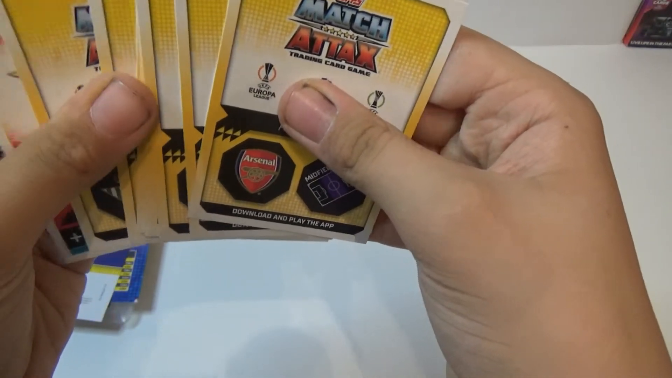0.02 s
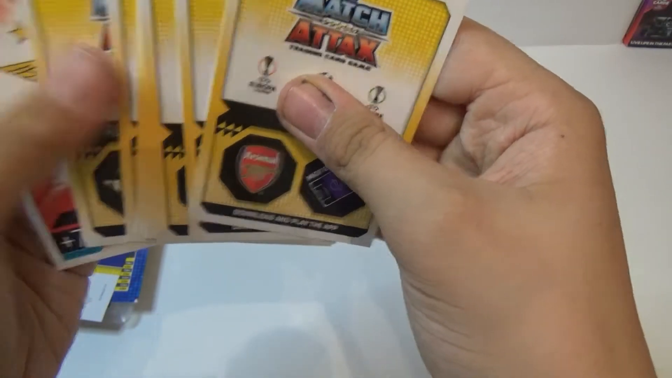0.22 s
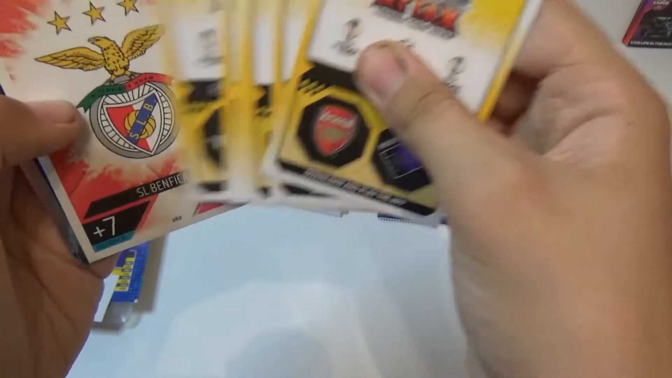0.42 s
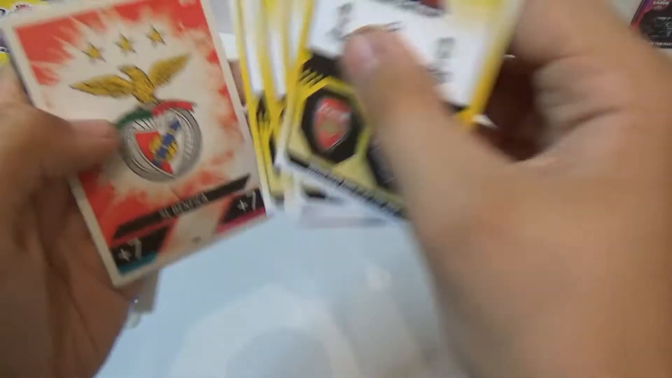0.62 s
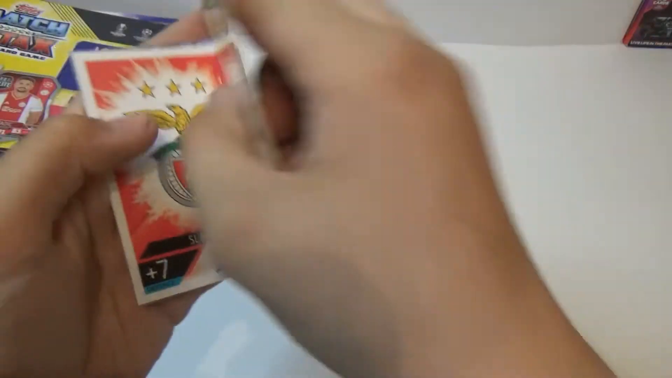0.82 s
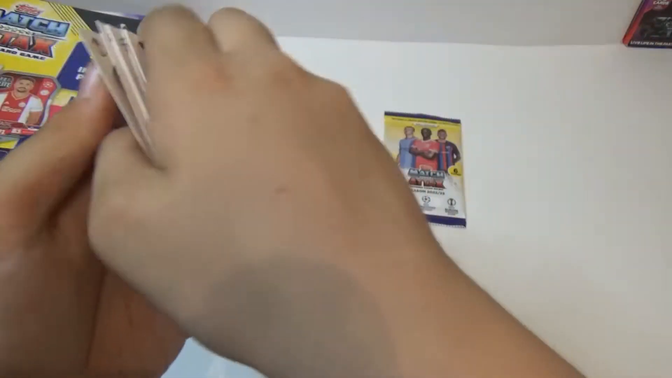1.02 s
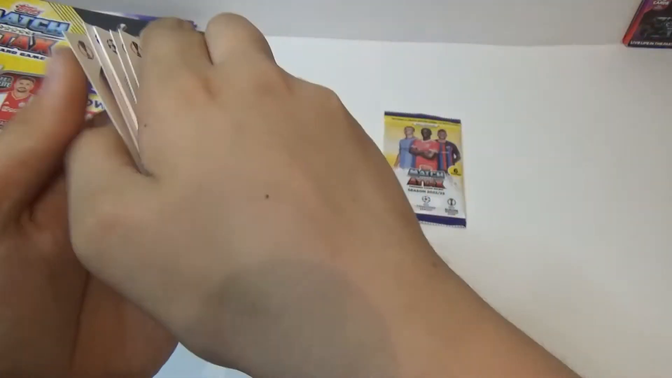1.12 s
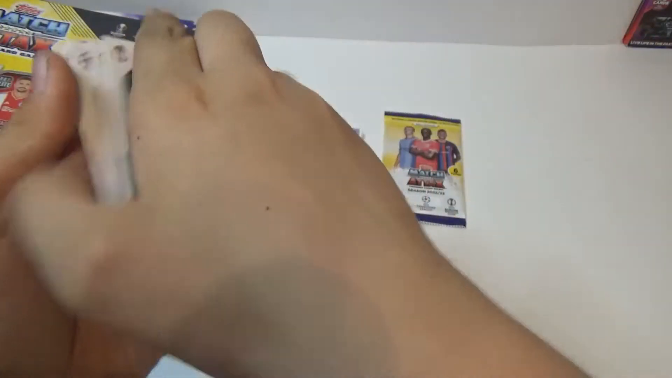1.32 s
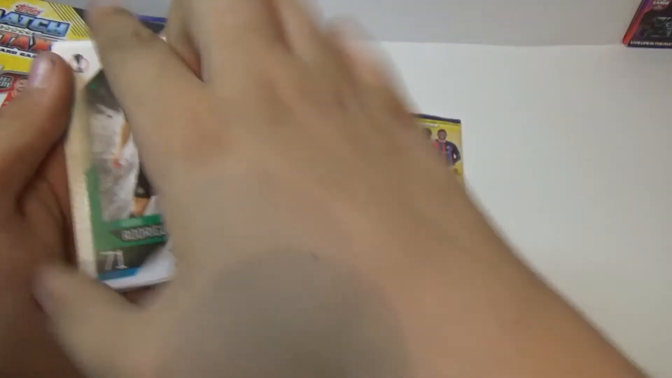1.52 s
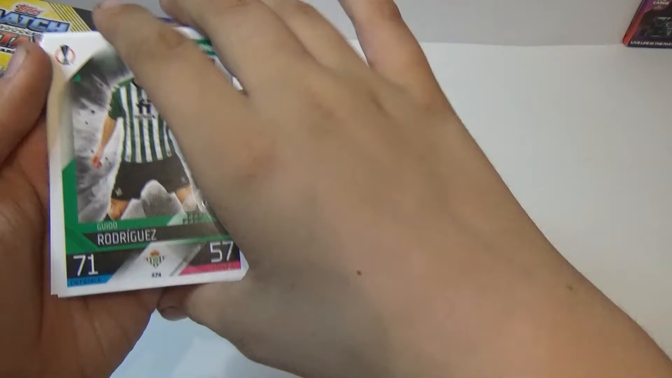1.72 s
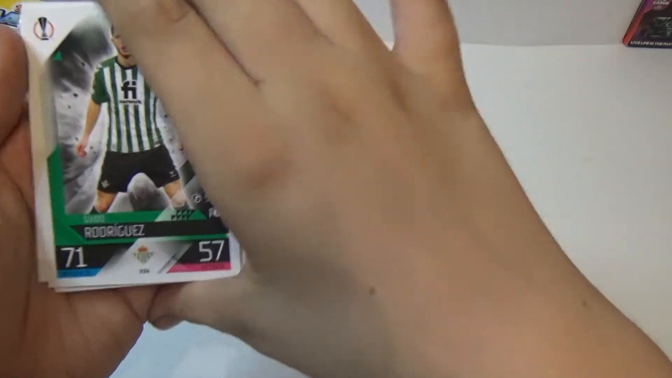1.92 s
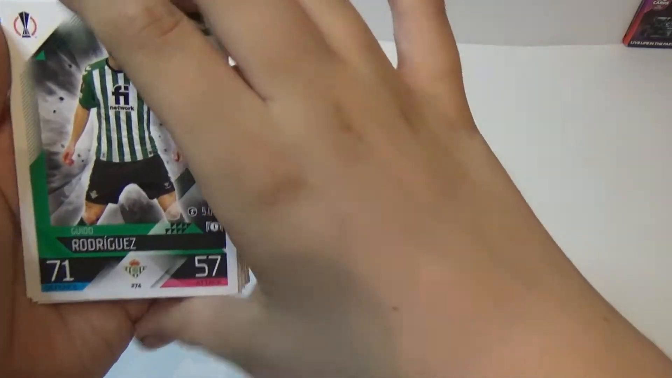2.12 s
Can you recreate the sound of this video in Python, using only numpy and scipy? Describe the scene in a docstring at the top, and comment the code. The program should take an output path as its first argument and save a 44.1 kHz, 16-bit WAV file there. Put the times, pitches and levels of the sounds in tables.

```python
"""A fan of trading cards is swept shut in the hands, knocked into a stack and squared up, close by in a small room.
Sliding cards are grainy coloured noise, and a bent card sings as a band of noise climbing in pitch.
Snapping edges are short noise cracks, the stack clacks as damped modes, and glossy faces squeak as wavering tones.
Soft low noise bursts are the thuds against the fingers; the room answers with a short diffuse tail.
Under it lies a steady room hiss with a faint regular tick."""
import sys
import numpy as np
from scipy import signal
from scipy.fft import rfft, irfft
from scipy.io import wavfile

SR = 44100
rng = np.random.default_rng(int(sys.argv[2]) if len(sys.argv) > 2 else 0)


def dump(signal):
    """Clip the signal to [-1, 1] and save it as 16-bit WAV at the path in sys.argv[1]."""
    limited = np.clip(np.atleast_2d(signal).T, -1, 1)
    pcm = np.round(limited * 32767).astype(np.int16)
    wavfile.write(sys.argv[1], SR, pcm)


N = 97020
T = np.arange(N) / SR  # seconds


def from_db(db):
    """Decibels to gain."""
    return 10 ** (np.asarray(db) / 20)


def rms_one(x):
    """Scale to unit rms."""
    return x / np.sqrt(np.mean(x ** 2) + 1e-20)


def at_hz(points, size):
    """Read a spectrum table at the bins of a transform, along a log pitch axis."""
    hz, value = np.transpose(points)
    bins_hz = np.fft.rfftfreq(size, 1 / SR)
    return np.interp(np.log(bins_hz + 1), np.log(hz), value)


def colour(x, points):
    """Give a steady signal a spectrum; unit rms."""
    return rms_one(irfft(rfft(x) * from_db(at_hz(points, N)), N))


def white_noise():
    """Flat noise for the whole scene."""
    return rng.standard_normal(N)


def drift(rate_hz):
    """Smooth random wander of spread 1: noise with everything faster than the rate rolled off."""
    rolloff = 1 + (np.fft.rfftfreq(N, 1 / SR) / rate_hz) ** 2
    return rms_one(irfft(rfft(white_noise()) / rolloff, N))


def flutter(spread_db, rate_hz):
    """A gain that wanders between random levels, two new ones per cycle of the rate."""
    steps = 2 * rate_hz * T
    return np.interp(steps, np.arange(2000), from_db(spread_db * rng.standard_normal(size=2000)))


GRAINS_PER_S, GRAIN_SPREAD_DB = 4500, 3.5
GRAIN_SHARE = 0.49  # share of the power in grains; the rest is smooth hiss
JUDDER_DB, JUDDER_HZ = 1.13, 90
PATCHY_DB, PATCHY_HZ = 2, 45  # the colour of a rub keeps shifting


def friction(points, count=12):
    """Dense tiny slips of uneven size over a smooth hiss; it judders and its colour shifts."""
    sizes_db = GRAIN_SPREAD_DB * np.minimum(rng.exponential(1, N), 4)
    sizes = from_db(sizes_db) * rng.choice([-1, 1], N)
    grains = rms_one(sizes * (rng.random(N) < GRAINS_PER_S / SR))
    slips = np.sqrt(GRAIN_SHARE) * grains + np.sqrt(1 - GRAIN_SHARE) * white_noise()
    spectrum = rfft(slips) * from_db(at_hz(points, N))
    # equal bands a twentieth of the range wide; the last takes all the treble above
    band = np.minimum((np.linspace(0, 1, len(spectrum)) * 20).astype(int), count - 1)
    patchy = sum(irfft(spectrum * (band == k), N) * flutter(PATCHY_DB, PATCHY_HZ) for k in range(count))
    return rms_one(patchy * flutter(JUDDER_DB, JUDDER_HZ))


# speed of the cards as the fan closes, as loudness: time_s, level_db
SWEEP_LEVEL = [(0.37, -60), (0.40, -44), (0.44, -33.5), (0.465, -31), (0.49, -29.5), (0.542, -35.5),
               (0.556, -46), (0.59, -72)]
# colour of the sweep: pitch_hz, density_db_per_hz
SWEEP_COLOUR = [(150, -39), (400, -20.5), (750, -6), (1300, -1), (2500, -5.7), (4000, -10.5), (6500, -1.8),
                (9500, 3.5), (12000, -5.5), (15500, -17)]
# a bent card sings as it slides: time_s, pitch_hz, level_db
SWEEP_RING = [(0.385, 5180, -65), (0.42, 5400, -43), (0.455, 5780, -35.5), (0.482, 6040, -35),
              (0.495, 6150, -48), (0.52, 6100, -75)]
RING_WIDTH_HZ = 700  # the ring is 6 dB down this far either side of its pitch


def sweep():
    """The fan slides shut; one resonance climbs as the free length of card shortens."""
    slide_db = np.interp(T, *np.transpose(SWEEP_LEVEL), left=-120, right=-120)
    slide = from_db(slide_db) * friction(SWEEP_COLOUR)
    time_s, pitch_hz, level_db = np.transpose(SWEEP_RING)
    phase = 2 * np.pi * np.cumsum(np.interp(T, time_s, pitch_hz)) / SR
    # two independent wanders make a noise band centred on the climbing pitch
    ring = drift(RING_WIDTH_HZ) * np.cos(phase) + drift(RING_WIDTH_HZ) * np.sin(phase)
    ring_db = np.interp(T, time_s, level_db, left=-120, right=-120)
    return slide + from_db(ring_db) * ring


# shorter rubs of card on card: start_s, length_s, attack_s, release_s, hiss_db, rasp_db
RUBS = [(0.036, 0.075, 0.021, 0.04, -52.5, -72), (0.116, 0.014, 0.0072, 0.032, -47.5, -56.5),
        (0.187, 0.049, 0.045, 0.01, -47, -59), (0.312, 0.076, 0.0018, 0.04, -48.5, -64),
        (0.557, 0.09, 0.011, 0.045, -49.5, -57), (0.648, 0.024, 0.018, 0.034, -40.5, -48),
        (0.681, 0.1, 0.051, 0.063, -39, -45), (0.762, 0.019, 0.003, 0.062, -44, -52),
        (0.803, 0.031, 0.024, 0.098, -37, -41.5), (0.857, 0.15, 0.035, 0.061, -50.5, -53.5),
        (0.998, 0.17, 0.074, 0.035, -48, -51.5), (1.184, 0.05, 0.015, 0.043, -56, -53.5),
        (1.235, 0.015, 0.006, 0.03, -37, -42.5), (1.277, 0.058, 0.005, 0.036, -38.5, -45),
        (1.307, 0.021, 0.015, 0.008, -33, -42), (1.336, 0.042, 0.03, 0.047, -37, -46),
        (1.393, 0.0087, 0.004, 0.028, -38.5, -46.5), (1.444, 0.07, 0.01, 0.085, -43, -49),
        (1.709, 0.028, 0.015, 0.034, -47.5, -54), (1.783, 0.02, 0.0066, 0.056, -48, -53.5),
        (1.842, 0.038, 0.019, 0.076, -49, -57), (1.904, 0.058, 0.02, 0.025, -59.5, -55.5),
        (2.064, 0.019, 0.007, 0.03, -54, -70), (2.141, 0.01, 0.003, 0.03, -43.5, -54)]
# colour of the smooth faces sliding: pitch_hz, density_db_per_hz
HISS_COLOUR = [(1500, -28), (3000, -10), (4200, -6), (6000, -3), (7500, -1.5), (9800, 1), (11500, -6),
               (13000, -12), (15500, -18.5)]
# colour of the card bodies under them: pitch_hz, density_db_per_hz
RASP_COLOUR = [(100, -23), (350, -12.5), (700, -8), (1400, -1), (2400, 0.5), (4000, -3), (7000, -13),
               (15000, -43)]


def rubs():
    """Sliding faces hiss over rasping card bodies; each rub swells, holds, then falls 20 dB per release."""
    hiss_power, rasp_power = 0, 0
    for start_s, length_s, attack_s, release_s, hiss_db, rasp_db in RUBS:
        swell = np.clip((T - start_s) / attack_s, 0, 1)
        fall = from_db(-20 * np.maximum(T - start_s - length_s, 0) / release_s)
        shape = swell * fall
        hiss_power = hiss_power + (shape * from_db(hiss_db)) ** 2
        rasp_power = rasp_power + (shape * from_db(rasp_db)) ** 2
    return np.sqrt(hiss_power) * friction(HISS_COLOUR) + np.sqrt(rasp_power) * friction(RASP_COLOUR)


# edges snap and the stack knocks; tilt is the hardness of the contact:
# start_s, knock_db, tilt_db_per_octave, favoured_hz, edge_db, decay_s
SNAPS = [(0.2243, -33, -6, 700, -22.5, 0.0065), (0.2379, -56, -2, 2500, -35, 0.01),
         (0.2411, -55, -3, 2500, -34, 0.0072), (0.2854, -36, -3.5, 380, -36, 0.0077),
         (0.3148, -46, -6, 1000, -30.5, 0.0048), (0.6829, -19, -4.3, 2600, -29, .0052),
         (0.7481, -16.5, 0, 1800, -20, 0.012), (0.7556, -27, 2.5, 3900, -20, 0.016),
         (0.7562, -24, -3.5, 1100, -28, .017), (0.7736, -32, -3, 600, -32, .009),
         (0.7896, -29.5, -2.5, 650, -31, .008), (0.8945, -48, 0, 1500, -34, 0.0077),
         (0.9757, -42, 2, 2500, -28, 0.0078), (0.984, -45, -7, 2500, -38, .01),
         (1.5222, -58, 0, 2500, -32, 0.003)]
# modes of the held stack, levels relative to the knock: pitch_hz, level_db, t60_s
STACK_MODES = [(380, -28, 0.02), (540, -21, 0.038), (750, -16.5, 0.032), (1210, -11, 0.026),
               (1484, -11.5, 0.019), (1877, -5, .011), (2500, -7.5, 0.0078), (3680, -4, .014),
               (4700, -12, .012)]
# colour of a snapping edge: pitch_hz, density_db_per_hz
EDGE_COLOUR = [(300, -14.5), (1000, -2), (2500, -10), (4000, -3.5), (5800, 0), (7500, -3), (9800, 2),
               (12000, -13), (15500, -20)]
FAVOUR_DB, FAVOUR_OCTAVES = 7, .42  # the spot that is struck brings out the modes near one pitch
USUAL_DECAY_S = .012  # a contact with this decay lets the modes ring for their listed t60
TILT_PIVOT_HZ = 1500


def snaps():
    """Each contact rings the stack's modes and throws a crack off the card edges; a tight grip damps both."""
    knocks, crack, t = np.zeros(N), np.zeros(N), T[:SR // 8]
    for start_s, knock_db, tilt_db, favoured_hz, edge_db, decay_s in SNAPS:
        start = int(start_s * SR)
        span = slice(start, start + len(t))
        for k, (pitch_hz, mode_db, t60_s) in enumerate(STACK_MODES):
            octaves_off = np.log2(pitch_hz / favoured_hz)
            favour = FAVOUR_DB * np.exp(-.5 * (octaves_off / FAVOUR_OCTAVES) ** 2)
            level_db = knock_db + mode_db + favour + tilt_db * np.log2(pitch_hz / TILT_PIVOT_HZ)
            gripped_t60_s = t60_s * decay_s / USUAL_DECAY_S
            ring = from_db(level_db - 60 * t / gripped_t60_s) * np.cos(2 * np.pi * pitch_hz * t)
            knocks[span] += (-1) ** k * ring  # neighbouring modes start in opposite phase
        crack[span] += from_db(edge_db - np.minimum(60 * t / decay_s, 200))
    return knocks + crack * colour(white_noise(), EDGE_COLOUR)


WAVER_SHARE, WAVER_S = 0.03, 0.001  # spread of a tone's pitch as a share, and time between its changes


def chirp(peak_s, pitch_hz, level_db, swell_s):
    """A wavering tone that swells and dies in a few milliseconds."""
    out = np.zeros(N)
    near = slice(max(int((peak_s - .02) * SR), 0), int((peak_s + .02) * SR))
    t = T[near] - peak_s
    waver = np.interp(t / WAVER_S + 20, np.arange(41), rng.standard_normal(size=41))
    phase = 2 * np.pi * np.cumsum(pitch_hz * (1 + WAVER_SHARE * waver)) / SR
    out[near] = from_db(level_db) * np.sqrt(2) * np.sin(phase) * np.exp(-.5 * (t / swell_s) ** 2)
    return out


# the glossy faces stick and squeak: peak_s, pitch_hz, level_db, swell_s
SQUEAKS = [(1.161, 2560, -45, .0025), (1.3305, 2590, -28.5, 0.002), (1.3295, 4380, -33, .0018),
           (1.327, 9300, -31.5, 0.003), (1.328, 10300, -31.5, 0.0024), (1.367, 7000, -36, .0028),
           (1.4015, 4270, -39, .002), (1.4035, 5040, -39.5, 0.002), (1.402, 6090, -41.5, .002)]


def squeaks():
    """Brief stick-slip tones while the stack is squared."""
    return sum(chirp(*row) for row in SQUEAKS)


# the fingers catch the stack with a soft thud: start_s, level_db
THUDS = [(0.683, -54), (0.757, -50), (0.976, -62)]
# colour of a thud: pitch_hz, density_db_per_hz
THUD_COLOUR = [(25, -6), (70, -3), (160, 2), (350, 0), (700, -12), (2000, -40)]
THUD_ATTACK_S, THUD_T60_S = .004, .15


def thuds():
    """Dull bumps of the stack against the fingers: low noise under a fast attack and a short fade."""
    shape = 0
    for start_s, level_db in THUDS:
        fade = from_db(level_db - 60 * np.maximum(T - start_s, 0) / THUD_T60_S)
        shape = shape + fade * np.clip((T - start_s) / THUD_ATTACK_S, 0, 1)
    return shape * colour(white_noise(), THUD_COLOUR)


# colour of the room's answer: pitch_hz, level_db
ROOM_COLOUR = [(100, 2), (500, 6.5), (1500, -1.5), (5000, 0), (9500, 0.5), (12000, -26)]
ROOM_T60_S, ROOM_DB, ROOM_DELAY_S = .2, -13.5, 0.00308


def room(x):
    """A short diffuse answer from desk and walls, different at each ear: decaying noise as echoes."""
    decay = from_db(-np.minimum(60 * T / ROOM_T60_S, 200)) * (T > ROOM_DELAY_S)
    ears = []
    for _ in range(2):
        tail = (colour(white_noise(), ROOM_COLOUR) * decay)[:SR // 2]
        ears.append(signal.fftconvolve(x, tail / np.linalg.norm(tail))[:N])
    return from_db(ROOM_DB) * np.array(ears)


# steady room hiss: pitch_hz, density_db_per_hz
FLOOR_COLOUR = [(25, -28), (60, -16), (150, -3), (400, 1), (800, 1.5), (1500, 0.5), (2400, 1), (4000, -3),
                (7000, -5), (9800, -3), (12000, -8), (15500, -12)]
# likeness of left and right in the room hiss: pitch_hz, likeness_0_to_1
LIKENESS = [(60, .95), (150, 1), (300, 0.6), (600, 0.02), (1500, 0), (5000, 0.69), (9000, 0.86), (12000, 1)]
FLOOR_DB = -53  # level of the part common to both ears


def room_hiss():
    """Steady coloured noise; the side signal is weighted so the ears agree as much as listed per pitch."""
    alike = at_hz(LIKENESS, N)
    mid = colour(white_noise(), FLOOR_COLOUR)
    side = colour(white_noise(), FLOOR_COLOUR)
    side = irfft(rfft(side) * np.sqrt((1 - alike) / (1 + alike)), N)
    return from_db(FLOOR_DB) * (mid + side * [[1], [-1]])


TICK_FIRST_S, TICK_EVERY_S, TICK_SWELL_S = .015, .0801, 0.0015
TICK_HZ, TICK_DB, TICK_SPREAD_DB = 2780, -51, 1


def ticks():
    """A faint high tick about twelve times a second: short wavering tones of slightly uneven level."""
    out = np.zeros(N)
    for k in range(27):
        level_db = TICK_DB + TICK_SPREAD_DB * rng.standard_normal()
        out += chirp(TICK_FIRST_S + k * TICK_EVERY_S, TICK_HZ, level_db, TICK_SWELL_S)
    return out


CARD_LOW_HZ = 210  # small cards radiate little below this
PAN_DB = 0.6  # left up and right down by this much


def scene():
    """The cards, slightly to the left, in the room, with the thuds and the background."""
    highpass = signal.butter(2, CARD_LOW_HZ, "high", fs=SR, output="sos")
    cards = signal.sosfilt(highpass, sweep() + rubs() + snaps() + squeaks())
    placed = (cards + room(cards)) * from_db([[PAN_DB], [-PAN_DB]])
    return placed + thuds() + room_hiss() + ticks()


CUTOFF_HZ = 15900


def record(dry):
    """The top is cut steeply by a high-order lowpass."""
    lowpass = signal.ellip(12, .1, 80, CUTOFF_HZ, fs=SR, output="sos")
    return signal.sosfilt(lowpass, dry)


dry = scene()
out = record(dry)
dump(out)
```